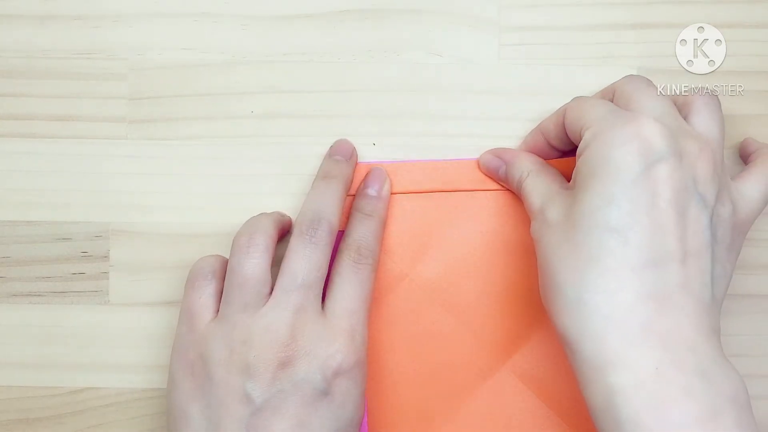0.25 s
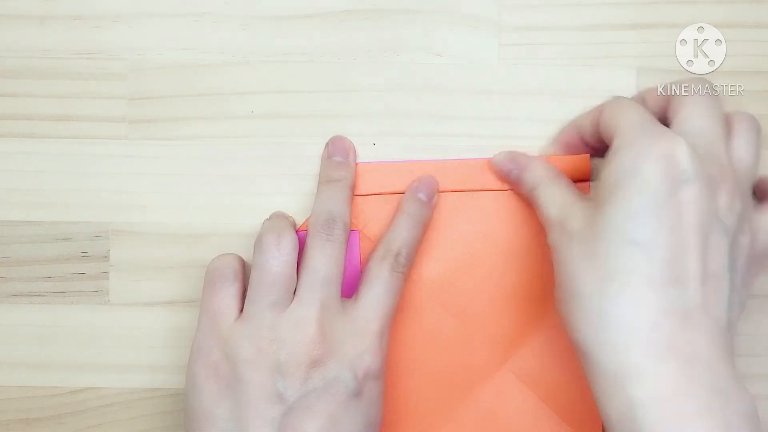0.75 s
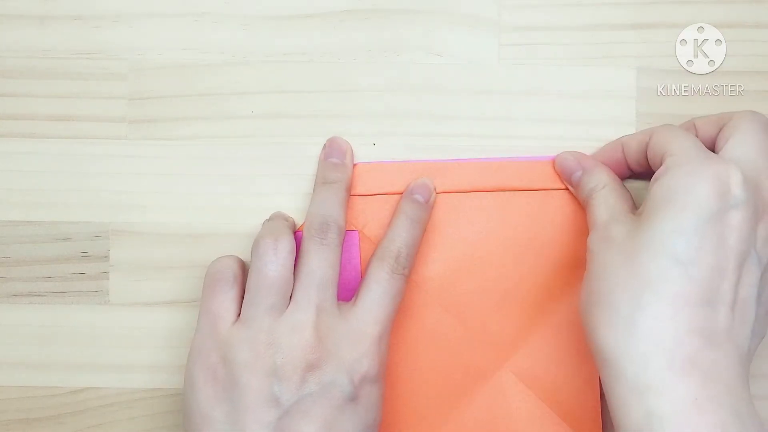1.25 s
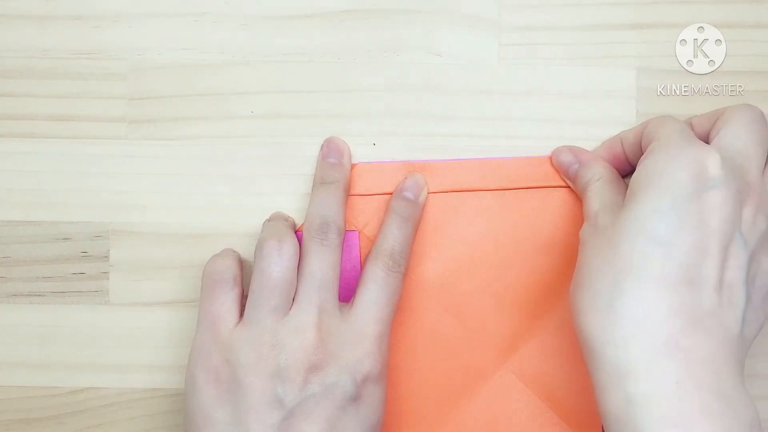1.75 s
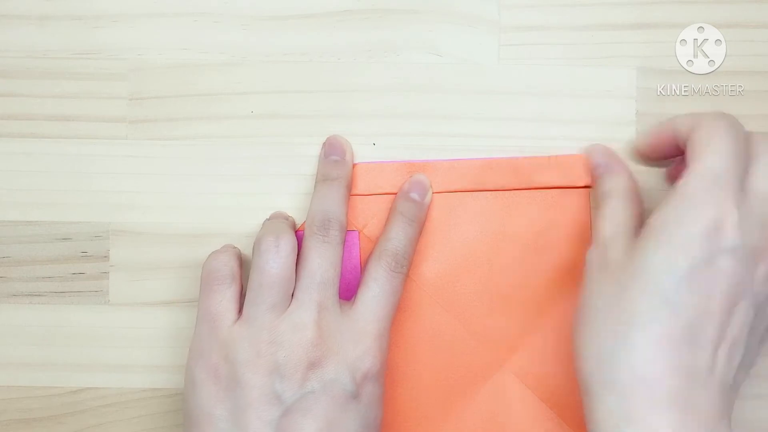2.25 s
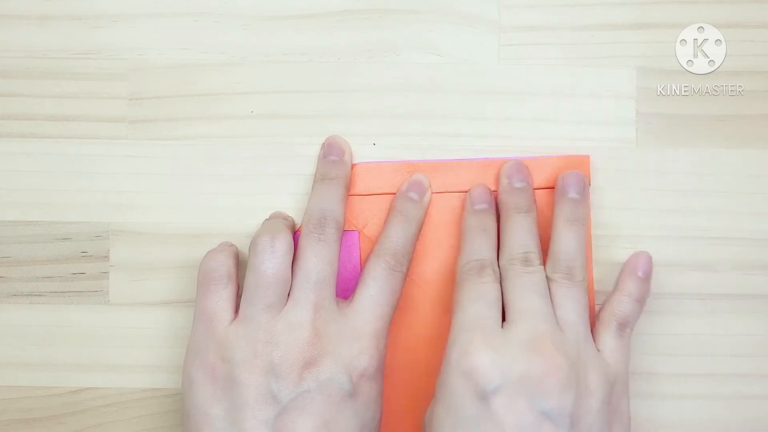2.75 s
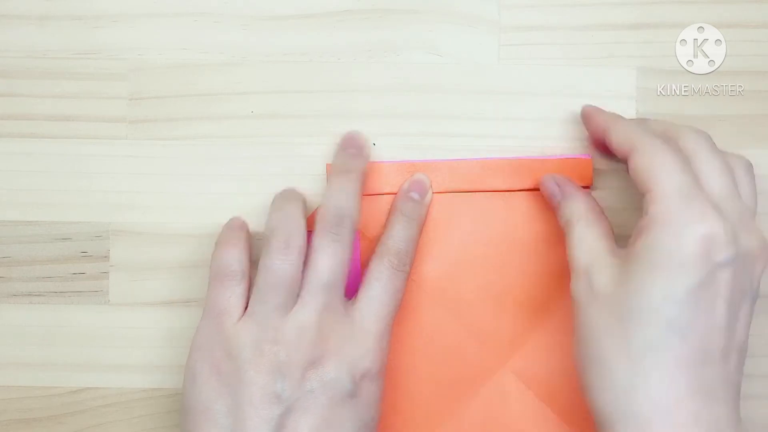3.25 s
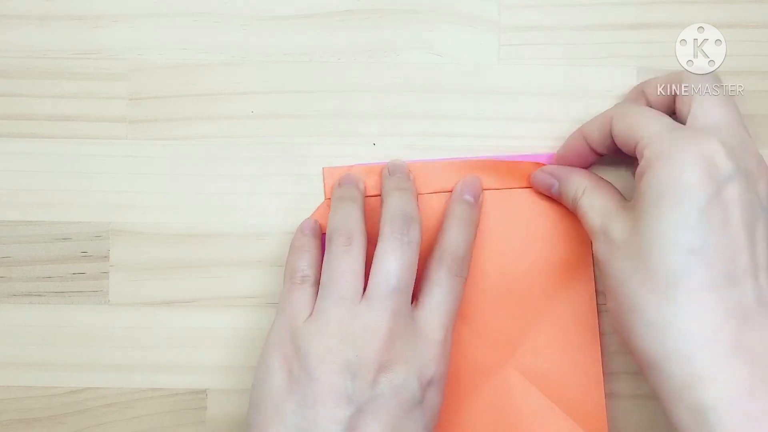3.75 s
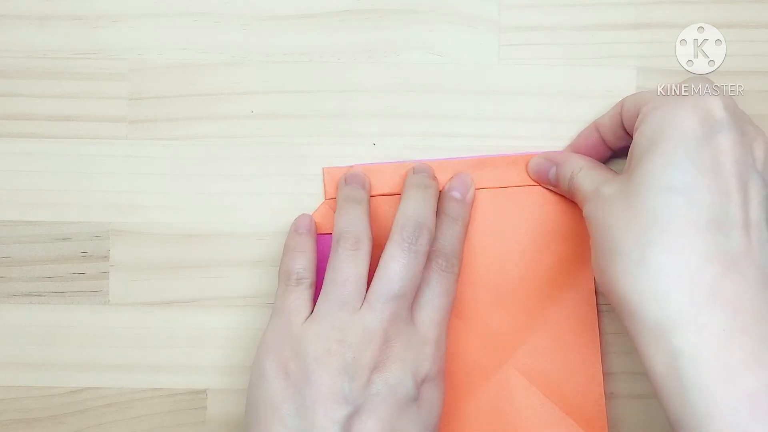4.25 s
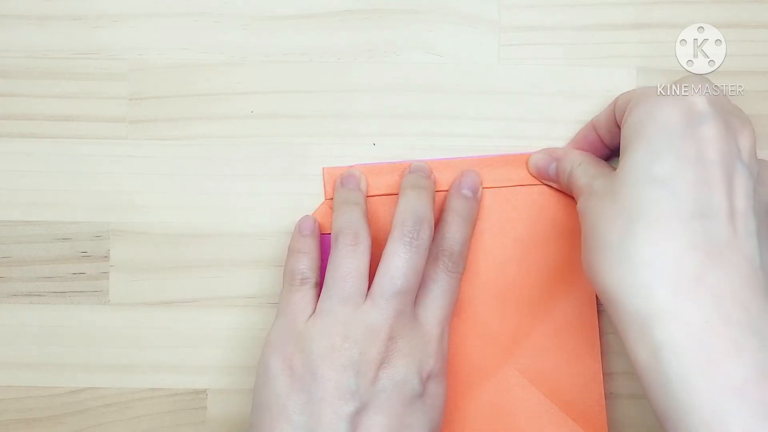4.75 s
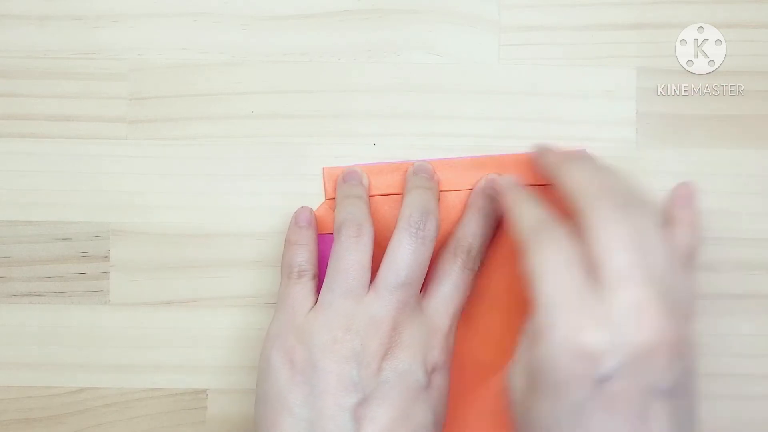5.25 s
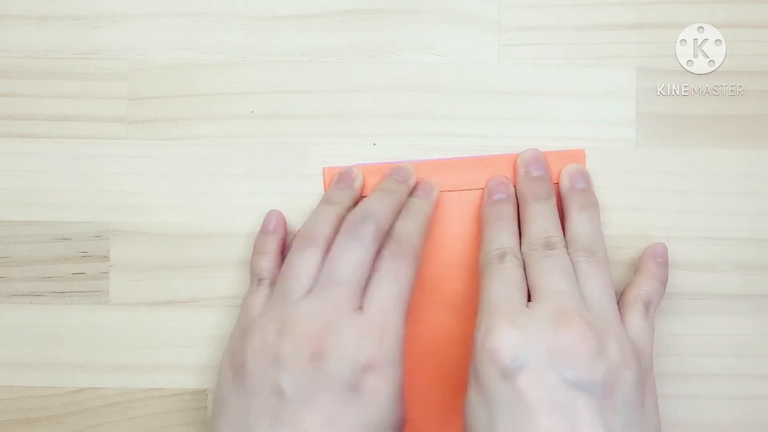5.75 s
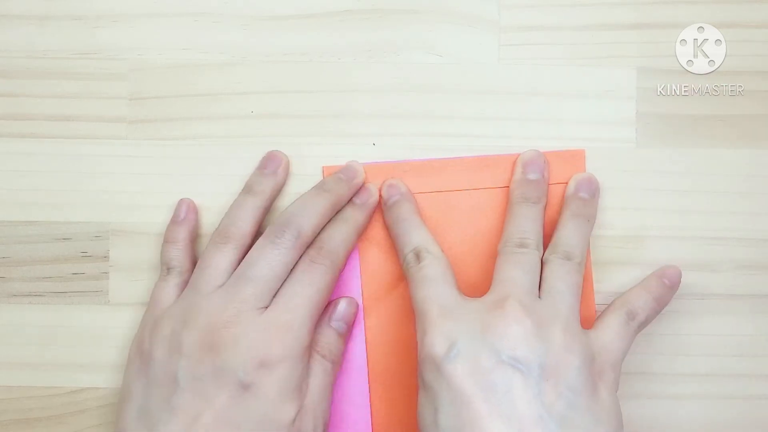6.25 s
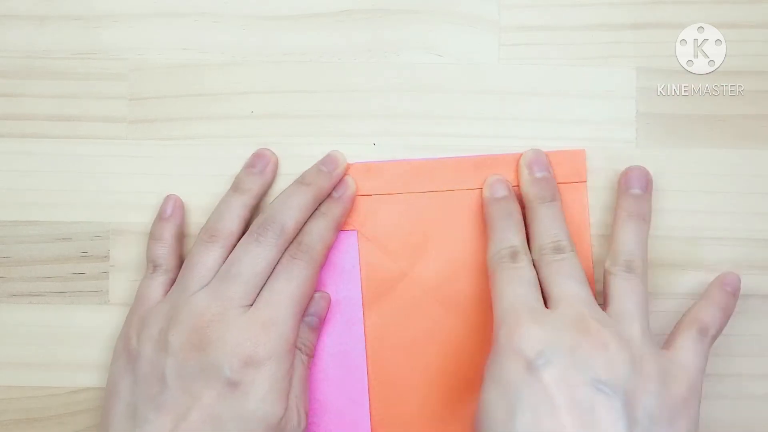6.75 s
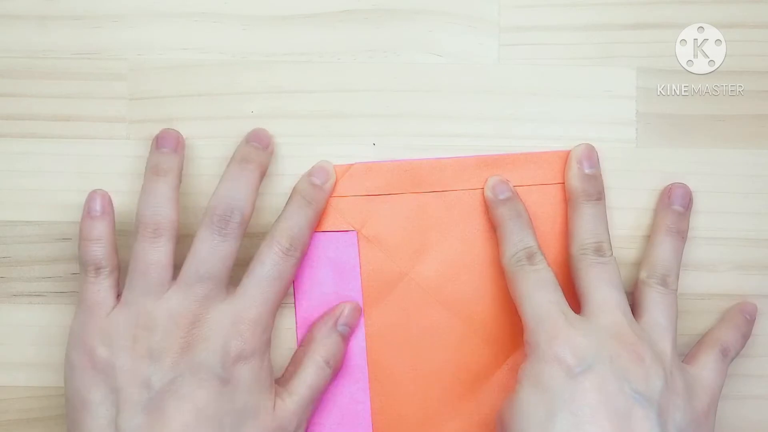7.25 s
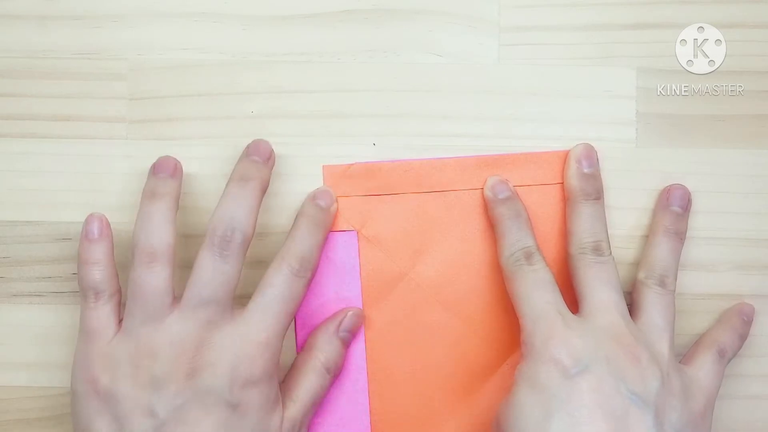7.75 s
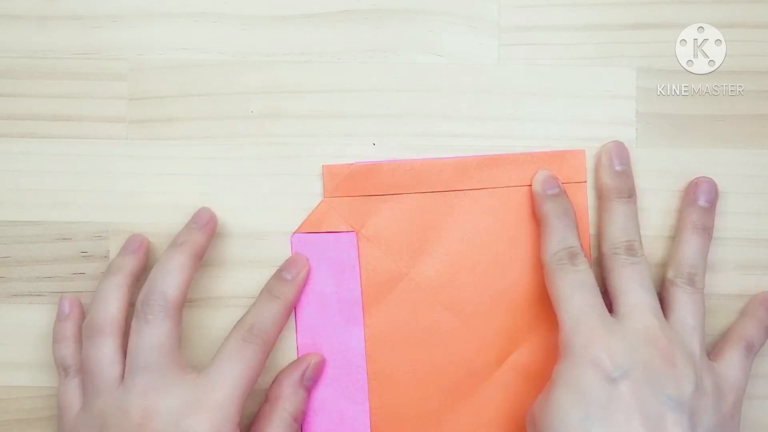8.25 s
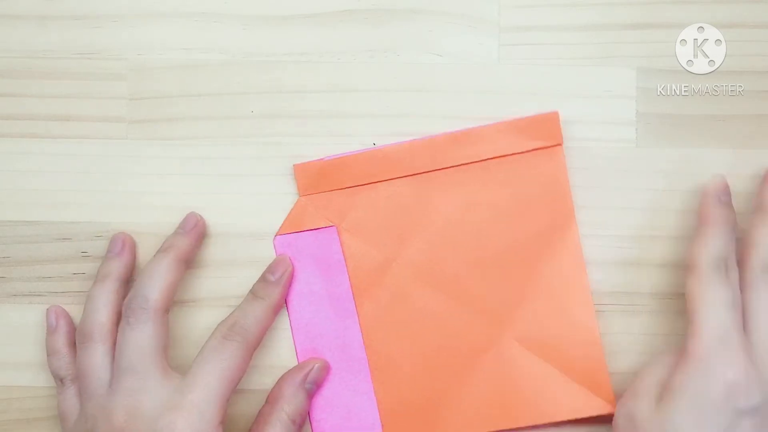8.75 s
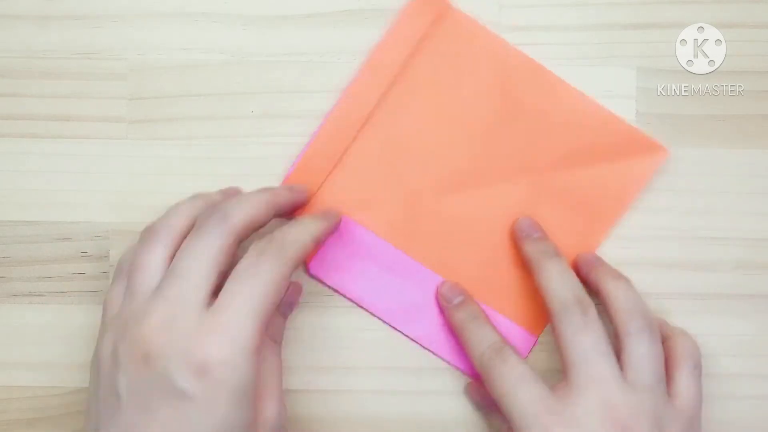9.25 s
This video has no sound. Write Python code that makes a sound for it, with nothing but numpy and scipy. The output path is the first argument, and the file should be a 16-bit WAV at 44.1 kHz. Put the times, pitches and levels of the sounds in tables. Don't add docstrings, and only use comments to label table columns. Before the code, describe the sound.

Close-up paper folding: skin rubs over crisp paper, folds snap and pop, fingertips tap the wood, and low bumps sway beneath.

```python
import sys
import numpy as np
from scipy import signal
from scipy.fft import rfft, irfft
from scipy.io import wavfile

SR = 44100
rng = np.random.default_rng(int(sys.argv[2]) if len(sys.argv) > 2 else 0)


def put_to_file(sound):
    columns = np.atleast_2d(sound).T
    safe = np.clip(columns, -1, 1)
    whole_steps = np.round(safe * 32767)
    wavfile.write(sys.argv[1], SR, whole_steps.astype(np.int16))


def amplitude_ratio(level_db):
    exponent = np.asarray(level_db, float) / 20
    return 10 ** exponent


N = 418950


def rms_one(x):
    return x / np.sqrt(np.mean(x ** 2) + 1e-20)


def seconds(length_s):
    return np.arange(round(length_s * SR)) / SR


def in_time(rows):
    s, *columns = np.transpose(rows)
    return [np.interp(np.arange(N) / SR, s, column) for column in columns]


def ms_clock():
    return np.arange(N * 1000 // SR + 1) / 1000


def at_rate(gains):
    return [np.interp(np.arange(N) / SR, ms_clock(), gain) for gain in gains]


def shaped(x, spectrum):
    hz, db = np.transpose(spectrum)
    bins = np.maximum(np.arange(N // 2 + 1) * SR / N, 1)
    gain = amplitude_ratio(np.interp(np.log(bins), np.log(hz), db))
    return rms_one(irfft(rfft(x) * gain, N))


def cut(x, hz, kind):
    sos = signal.butter(2, np.clip(hz, 10, .45 * SR), kind, fs=SR, output="sos")
    return signal.sosfilt(sos, x)


def resonate(x, hz, width_hz):
    r = np.exp(-np.pi * width_hz / SR)
    poles = [1, -2 * r * np.cos(2 * np.pi * hz / SR), r * r]
    return signal.lfilter([(1 - r * r) / 2, 0, (r * r - 1) / 2], poles, x)


def body(x, modes):
    return sum((-1) ** k * amplitude_ratio(db) * resonate(x, hz, width_hz)
               for k, (hz, width_hz, db) in enumerate(modes))


def flutter(rate_hz, depth_db):
    r = np.exp(-2 * np.pi * rate_hz / SR)
    wander = signal.lfilter([1], [1, -2 * r, r * r], rng.standard_normal(N + SR))[SR:]
    return amplitude_ratio(depth_db * rms_one(wander))


def grit(per_s, spread_db):
    sizes = amplitude_ratio(spread_db * np.minimum(rng.exponential(1, N), 4)) * rng.standard_normal(N)
    return rms_one(sizes * (rng.random(N) < per_s / SR))


def add(out, s, burst, db):
    i = round(s * SR)
    out[i:i + len(burst)] += (amplitude_ratio(db) * burst / np.abs(burst).max())[:N - i]


def swell(s, db, fall_db_per_s, rise_db_per_s=8000):
    t = ms_clock() - s
    return amplitude_ratio(db + np.minimum(rise_db_per_s * t, -fall_db_per_s * t))


# frequency in Hz, level in dB per Hz.
AIR_SPECTRUM = [(15, -20), (28, 3.5), (62, 2), (110, -49), (200, -15.5), (300, -20.5), (760, -25.5),
                (970, -21), (1600, -30.5), (4500, -39), (9600, -42), (12300, -41), (13600, -52.5),
                (16000, -49.5)]


def room_air():
    return amplitude_ratio(-55) * shaped(rng.standard_normal(N), AIR_SPECTRUM)


def room(x):
    t60_s, first_echo_s = 0.244, .004
    t = seconds(.2)
    tail = cut(rng.standard_normal(len(t)), 6920, "low") * amplitude_ratio(-60 * t / t60_s) * (t > first_echo_s)
    return signal.fftconvolve(x, tail / np.sqrt(np.sum(tail ** 2)))[:N]


# time in seconds, deep sway in dB.
LEAN = [(0, -52.5), (.4, -57), (1.2, -52.5), (2.75, -57), (3.09, -53.5), (3.31, -36.5), (3.72, -35),
        (3.85, -45.5), (4.23, -52), (4.7, -53), (5.22, -48), (5.3, -33), (5.48, -37), (5.79, -48),
        (6.05, -52.5), (7, -53.5), (8.3, -56), (9.5, -50.5)]
# time of the peak in seconds, deep sway in dB, legs in dB relative to it,
# # seconds to fall 20 dB.
JOLTS = [(.66, -52, -14, 0.03), (1.88, -41, -11.5, 0.15), (2.04, -42, -11, 0.2842),
         (2.35, -41.5, -17, 0.28), (2.64, -51, -2, 0.08), (3.31, -40, -12, .3), (3.55, -35, -6, 0.18),
         (3.729, -36, -10, 0.18), (3.9, -36.5, -16.5, .5), (1.55, -46.5, -10.5, 0.44),
         (6.05, -45.5, -15, 0.23), (6.66, -41.5, -11, 0.32), (8.05, -47, -9.5, 0.25), (4.34, -48, -6, 0.06),
         (4.87, -42, -2, 0.1045), (5.13, -43, -22, 0.52), (5.262, -34.5, 5.5, 0.1945), (5.6, -44, -1, 0.3),
         (5.84, -50, 5, 0.15), (6.16, -42, -4, 0.4), (6.72, -43, -15, 0.22), (6.77, -48, 3, 0.24),
         (7.01, -50, -2, 0.52), (7.73, -47.5, -7, 0.33), (7.86, -55.5, 3, 0.56), (8.2, -49.5, -5.5, 0.06),
         (8.91, -46, -12, 0.04), (9.24, -46, -2, 0.2)]


def rocking():
    legs_under_db, resting_legs_db = -10.5, -64
    rise_db_per_s, legs_rise_faster, legs_die_faster = 252, 2.5, 1.32
    deep = amplitude_ratio(np.interp(ms_clock(), *np.transpose(LEAN)))
    upper = np.maximum(deep * amplitude_ratio(legs_under_db), amplitude_ratio(resting_legs_db))
    for s, db, legs_db, fall_s in JOLTS:
        fall_db_per_s = 20 / fall_s
        deep = np.maximum(deep, swell(s, db, fall_db_per_s, rise_db_per_s))
        legs = swell(s, db + legs_db, legs_die_faster * fall_db_per_s, legs_rise_faster * rise_db_per_s)
        upper = np.maximum(upper, legs)
    return at_rate([deep, upper])


# frequency in Hz, width in Hz, level in dB.
STAND_MODES = [(38.5, 8.25, -1), (64.16, 15.73, 1.5), (82.65, 20.84, -1.5), (107.56, 20.6, -7.5)]
# frequency in Hz, width in Hz, level in dB.
LEG_MODES = [(125.15, 41.4, 2), (189.1, 28.2, 0.5), (242.7, 48.5, -10)]


def sway():
    deep_gain, upper_gain = rocking()
    deep = body(rng.standard_normal(N), STAND_MODES)
    deep = rms_one(cut(cut(deep, 127.8, "low"), 24.4, "high"))
    upper = body(grit(400, 1.4), LEG_MODES)
    upper = rms_one(cut(cut(upper, 248.3, "low"), 80.2, "high"))
    return deep_gain * deep + upper_gain * upper


# start in seconds, peak in dB, frequency in Hz, T60 in seconds.
KNOCKS = [(.63, -39, 55, .15), (3.51, -26, 82, .3), (3.565, -30, 68, .4), (3.72, -30, 62, .4),
          (4.862, -26, 48, .13), (5.275, -24, 95, .1), (5.33, -25, 66, .3), (5.43, -34, 55, .15),
          (6.165, -32, 58, .15), (8.888, -32, 84, .15), (9.235, -34, 75, .15)]


def knocks():
    rise_s = .012
    out, t = np.zeros(N), seconds(.3)
    for s, db, hz, t60_s in KNOCKS:
        envelope = (1 - np.exp(-t / rise_s)) ** 2 * amplitude_ratio(-60 * t / t60_s)
        add(out, s, envelope * np.sin(2 * np.pi * hz * t), db)
    return out


# frequency in Hz, width in Hz, level in dB.
BOARD_MODES = [(334, 26, 3.5), (422.3, 33.5, 5.5), (634, 42, -0.5)]
# frequency in Hz, width in Hz, level in dB.
BOARD_TOP_MODES = [(996, 266, -12), (1490.4, 86.8, 4), (1664.8, 50.8, 0), (2000, 113, -2.5),
                   (3140, 164, -2), (2400, 150, -5)]
# start in seconds, peak in dB, thud and nail in dB relative to it.
TAPS = [(0.003, -43, -13, -6), (0.475, -53, -11, 11.5), (0.572, -38.5, -14.5, -5), (2.004, -38.5, 5, -3.5),
        (2.084, -41, -15.5, -3), (2.14, -50, -0.5, 12), (2.407, -39.5, -11.5, -8.5),
        (3.152, -42.5, 11, -10.5), (3.495, -41, 18.5, 2.5), (3.601, -49, 3, 16), (3.846, -40, -18, 2.5),
        (4.309, -42.5, 4, -9.5), (4.342, -41, -20, 0), (4.851, -26, -12.5, -14.5), (5.406, -37.5, 9, -12.5),
        (5.831, -22, -24, -8), (6.121, -37, 2.5, -9), (6.141, -27, 6, -2.5), (6.239, -28, -14, -5.5),
        (6.381, -32.5, -14.5, -10.5), (6.444, -39.5, -14.5, -4), (6.544, -46, -9, 6.5), (6.759, -37, 7, -4),
        (6.789, -33, -15.5, -1), (7.709, -34.5, -5.5, 1.5), (8.161, -35.5, -18, 1), (9.12, -51, -11, 10.5),
        (9.225, -23.5, -15.5, -17.5)]
# start in seconds, peak in dB.
TOUCHES = [(0.121, -41.5), (0.531, -38.5), (1.54, -45), (1.673, -43), (1.799, -45), (1.851, -47.5),
           (2.035, -33.5), (2.247, -46.5), (2.6, -37), (3.228, -42.5), (4.001, -45), (4.459, -53.5),
           (4.738, -37.5), (4.941, -40), (5.353, -43.5), (5.487, -38), (5.527, -38), (5.586, -38.5),
           (6.647, -35), (6.7, -34.5), (6.994, -36.5), (7.075, -40.5), (5.34, -36.5), (6.56, -35.5),
           (7.899, -39), (9.437, -45.5)]
# start in seconds, peak in dB.
PALM = [
    (5.246, -35),
    (5.257, -29),
    (5.271, -32.5),
    (5.284, -33.5),
    (5.31, -36),
]


def taps():
    touch_thud_db, touch_nail_db = -5, -17
    tap_t60_s, skid_t60_s, skid_db = .012, .05, -8
    out, t = np.zeros(N), seconds(.12)
    rows = TAPS + [(s, db, touch_thud_db, touch_nail_db) for s, db in TOUCHES]
    dying = amplitude_ratio(-60 * t / tap_t60_s) + amplitude_ratio(skid_db - 60 * t / skid_t60_s)
    noise = rng.standard_normal((len(rows) + len(PALM), len(t))) * dying
    pads = cut(cut(cut(noise, 162, "high"), 950, "low"), 950, "low")
    pads = amplitude_ratio(-7) * pads + body(pads, BOARD_MODES)
    nails = cut(cut(cut(noise, 886, "high"), 2450, "low"), 3500, "low")
    nails = nails / 5 + body(nails, BOARD_TOP_MODES)
    thuds = body(noise, LEG_MODES)
    for (s, db, thud_db, nail_db), pad, nail, thud in zip(rows, pads, nails, thuds):
        add(out, s, pad, db - 6.5)
        add(out, s, nail, db + nail_db)
        add(out, s, thud, db + thud_db - 16)
    for (s, db), pad in zip(PALM, pads[len(rows):]):
        add(out, s, cut(cut(pad, 390, "low"), 390, "low"), db)
    return out


# start in
# seconds, # length in seconds, level in dB, first and last frequency in Hz.
SINGING = [(5.62, .2, -66, 5600, 6200), (5.75, .07, -66, 10500, 11000), (6.44, .16, -63, 2750, 2950),
           (6.5, .1, -66, 3500, 3400), (7.75, .02, -60, 4500, 4500), (8.22, .1, -66, 5600, 5800),
           (8.66, .09, -53, 6000, 6700), (8.78, .1, -55, 6300, 5700), (8.79, .09, -59, 3000, 3150),
           (8.92, .04, -56, 8500, 8800), (9.0, .045, -56, 5000, 4700), (9.09, .14, -55, 8800, 8200),
           (9.2, .12, -58, 8800, 9000), (9.1, .06, -58, 6300, 6000), (9.12, .1, -60, 750, 830),
           (0.0, .035, -58, 1050, 1000), (0.25, .05, -64, 1000, 900), (3.603, .03, -49, 1250, 2000),
           (3.51, .07, -57, 1700, 2200), (.535, .02, -54, 650, 620), (.5, .07, -60, 5700, 5800),
           (.66, .05, -61, 4000, 3700), (8.74, .04, -58, 600, 640), (8.88, .06, -56, 800, 760),
           (9.25, .04, -56, 620, 640), (5.64, .17, -60, 1550, 1500), (5.25, .04, -56, 880, 800),
           (.1, .2, -62, 340, 330), (9.44, .05, -57, 800, 800)]


def singing():
    width = 0.17
    out = np.zeros(N)
    noise = rng.standard_normal((len(SINGING), 2, SR // 3))
    for (s, length_s, db, from_hz, to_hz), pair in zip(SINGING, noise):
        whole_s = 1.4 * length_s
        share = seconds(min(whole_s, .3)) / whole_s
        phase = 2 * np.pi * np.cumsum(from_hz + (to_hz - from_hz) * share) / SR
        a, b = cut(pair, width * from_hz / 2, "low")[:, -len(share):]
        band = rms_one(a * np.cos(phase) + b * np.sin(phase))
        i = max(round((s - .2 * length_s) * SR), 0)
        out[i:i + len(share)] += amplitude_ratio(db) * np.sin(np.pi * share) * band
    return out


def stroke(s, length_s):
    attack_s, release_s = 0.0075, 0.021
    t, ease_s = ms_clock() - s, 0.134 * length_s
    rise = .5 + t / (attack_s + ease_s)
    fall = .5 + (length_s - t) / (release_s + ease_s)
    return np.clip(np.minimum(rise, fall), 0, 1)


# start in seconds, length in seconds, hiss in dB, pressure on the board in dB relative to
STROKES = [(0.496, 0.099, -54, -7.5), (0.604, 0.1736, -49.5, -8), (.775, 0.067, -60, -2.5),
           (1.309, 0.0215, -62.5, 5), (1.992, 0.048, -67.5, 7.5), (2.087, 0.0646, -53.5, -7),
           (2.336, 0.0316, -59, 0.27), (2.364, 0.144, -52, -16.5), (2.498, 0.0339, -58.5, -12.5),
           (2.595, 0.0248, -62, 0.08), (2.711, 0.087, -66.5, -2), (2.844, 0.085, -59.5, -11),
           (2.934, 0.0626, -55, -10.5), (2.993, .05, -61.5, 0.72), (3.172, 0.123, -65, 6.5),
           (3.28, 0.063, -60, 4.5), (3.342, 0.127, -70, 12), (3.473, 0.1097, -53, 0.3),
           (3.599, 0.042, -51.5, 1.34), (3.642, .07, -61, 3.5), (3.71, 0.1255, -62.5, -1.18),
           (3.859, 0.192, -66.5, 2.5), (4.649, 0.0595, -59, -17), (4.848, 0.052, -55, -5.3),
           (4.899, .04, -66.5, 6.5), (4.946, 0.067, -54, -11.5), (5.189, 0.021, -68, 6.5),
           (5.246, 0.0256, -73, 19.5), (5.27, 0.0604, -53, -2.5),
           (5.407, 0.253, -63, 5), (5.641, 0.0996, -60, 7.5), (5.73, 0.099, -57, 2),
             (5.827, 0.0708, -62, 9.5), (5.899, 0.19, -69, 7), (6.24, .06, -64, 8), (6.3, .08, -70, 2),
             (6.81, .1, -68, 3), (6.135, 0.036, -62.5, 9.5), (6.179, 0.107, -66, 12),
             (6.377, 0.178, -64, 11), (6.545, 0.0532, -60.5, 13.5), (6.601, 0.1595, -65.5, 11.5),
             (6.755, 0.0579, -56.5, 11), (6.036, 0.0206, -71, 4), (6.34, 0.0158, -67, .1),
             (9.439, .07, -59.5, 11.5), (7.073, 0.0507, -62, -0.25), (7.343, 0.0794, -60.5, 0.29),
             (7.725, 0.062, -59, 3.93), (7.842, 0.185, -67, 4.5), (8.001, 0.0356, -60.5, 3),
             (8.03, .13, -68, 3.5), (8.162, 0.0505, -58, 6.5), (8.198, 0.185, -59.5, 2.5),
             (8.56, 0.1, -62, 1.14), (8.654, 0.108, -50, -5), (8.772, 0.11, -50.5, -4),
             (8.878, 0.0448, -51, 2.5), (8.922, 0.045, -51, -10), (8.965, .03, -55, -10),
             (8.995, .055, -50, -10), (9.04, .03, -53.5, -8), (9.06, 0.075, -51.5, -8.5),
             (9.117, 0.2194, -50, -3), (9.32, .05, -55, -3), (9.337, 0.164, -60.5, 3.5)]


def friction():
    resting_db = [[-79], [-72], [-68.5]]
    hiss, sheet, board = amplitude_ratio(resting_db) + 0 * ms_clock()
    for s, length_s, db, pressure_db in STROKES:
        gain = amplitude_ratio(db) * stroke(s, length_s)
        hiss = np.maximum(hiss, gain)
        sheet = np.maximum(sheet, gain * amplitude_ratio(-4 + 0.57 * pressure_db))
        board = np.maximum(board, gain * amplitude_ratio(pressure_db))
    for s, db, *_ in CRACKS + POPS:
        sheet = np.maximum(sheet, swell(s, -34 + 0.619 * db, fall_db_per_s=350.5))
    for s, db, _, nail_db in TAPS:
        board = np.maximum(board, swell(s, db - 13.5 + 0.474 * nail_db, fall_db_per_s=153))
    return at_rate([hiss, sheet, board])


# frequency in Hz, level in dB per Hz.
HISS_SPECTRUM = [(2350, -18), (4000, -7.5), (7620, -4.5), (8650, 1), (10300, -5), (14200, -9.5),
                 (15200, -18.5), (16000, -37.5)]
# frequency in Hz, width in Hz, level in dB.
POCKET_MODES = [(5720, 320, 0), (8700, 800, -4)]
# time in seconds, level in dB.
POCKET_LEVEL = [
    (0, 5.5),
    (3.1, 4.5),
    (4.2, -3.5),
    (9.5, -7.5),
]
# time in seconds, level of the upper hiss in dB.
SHINE = [(0, -1.5), (.9, -3.5), (1.3, 0), (6, .5), (6.5, 1.5), (8.2, 1), (8.7, -2.5), (9.5, -0.4)]


def dry_hiss():
    fine = shaped(grit(11000, 1.6), HISS_SPECTRUM)
    low, dull = cut(fine, 5200, "low"), cut(fine, 9520, "low")
    bright = cut(fine, 13700, "high")
    bands = (low, dull - low, fine - dull - bright, bright)
    patches = [band * flutter(12, 1.3) for band in bands]
    upper = amplitude_ratio(*in_time(SHINE)) * sum(patches[2:])
    pocket = amplitude_ratio(*in_time(POCKET_LEVEL)) * body(fine, POCKET_MODES)
    return rms_one(sum(patches[:2]) + upper + pocket)


# frequency in Hz, width in Hz, level in dB.
SHEET_MODES = [(2000, 322, -7), (2400, 51, 5), (2818, 73, -7), (3140, 114, -0.5)]


def sheet_rustle():
    rustle = cut(cut(grit(9000, 2.2), 1800, "high"), 4600, "low")
    return rms_one(rustle / 2 + body(rustle, SHEET_MODES)) * flutter(30, 0.42)


def board_rub():
    rub = cut(cut(grit(2500, 3.0), 307, "high"), 1750, "low")
    low = flutter(4.52, 2.64) * body(rub, BOARD_MODES)
    upper = amplitude_ratio(1.0) * body(rub, BOARD_TOP_MODES)
    return rms_one(amplitude_ratio(-8.0) * rub + low + upper) * flutter(20.5, 1.185)


def sliding():
    hiss_gain, sheet_gain, board_gain = friction()
    paper = hiss_gain * dry_hiss() + sheet_gain * sheet_rustle()
    return flutter(30, 1.8) * (paper + amplitude_ratio(-2.0) * board_gain * board_rub())


# start in seconds, peak in dB, centre in Hz, top edge in dB
CRACKS = [(0.5768, -39, 5670, -21), (0.608, -44.5, 5700, -25), (0.803, -11, 6600, -15),
          (1.311, -49.5, 5630, -9.5), (2.005, -34, 5580, -24), (2.4053, -26.5, 4990, -23.5),
          (2.599, -40, 6150, -15), (2.7891, -47.5, 5500, -24), (2.8454, -46.5, 5740, -10),
          (2.9774, -28, 5360, -8), (3.026, -35, 5270, -31), (3.4979, -27.5, 4870, -4),
          (3.5289, -33.5, 6200, -11), (3.8444, -26.5, 5260, -35), (4.342, -38.5, 4100, -29),
          (4.8509, -41, 5650, 3), (4.8872, -29, 4530, 1.5), (4.9394, -46, 7910, -8),
          (5.004, -23, 7610, -5.5), (5.002, -33, 3600, -19.5), (0.4495, -50.5, 5560, -6),
          (4.279, -50, 5600, -5), (5.1877, -43.5, 8900, -6.5), (7.0724, -46, 4610, -2.5),
          (7.165, -52.5, 5000, -3.5), (8.879, -30, 3700, -17.5), (8.896, -30, 3100, -16.5)]
# start in seconds, peak in dB, centre in Hz, top edge in dB
POPS = [(0.4774, -40, 1990, -28.5), (0.5646, -38.5, 2330, -21.5), (0.752, -37, 1930, -16.5),
        (1.2663, -47, 2380, -12), (2.085, -28, 2020, -3), (2.1413, -25, 2370, 0),
        (2.3395, -36.5, 2400, -6.5), (3.1168, -46.5, 2200, -5.5), (3.1762, -44.5, 2320, -1),
        (3.325, -39.5, 3140, -20), (3.47, -38, 2385, -3.5), (3.603, -39, 2300, -5.5),
        (3.6174, -32.5, 2230, -17.5), (4.0028, -46, 1790, -0.5), (4.061, -25, 2840, -1.5),
        (5.3088, -32, 2860, 0), (5.527, -40.5, 2000, -15.5), (6.1185, -44, 1710, -11.5),
        (6.1404, -39, 3140, -1.5), (6.2407, -41, 2000, -21), (6.543, -42, 1990, -21),
        (6.759, -38, 1990, -14), (6.7796, -35, 2020, -5.5), (7.345, -47, 1970, -3),
        (7.7075, -38.5, 2720, -35.5), (7.819, -25, 3210, -34), (8.0222, -43, 2730, -16),
        (8.1604, -37.5, 2425, -19.5), (8.8898, -32.5, 2000, -21.5)]
# start in seconds, peak in dB, centre in Hz, top edge in dB relative to the core.
TICKS = [(5.4142, -46, 2510, -8), (5.481, -47, 2800, -6), (6.047, -55, 6000, 0), (6.2169, -44, 3040, -12),
         (6.3466, -52, 9600, 0), (6.38, -47, 2750, -8), (6.6484, -49, 9000, 0), (6.6993, -49, 9000, 0),
         (6.7327, -45, 2960, -10), (7.98, -52, 2500, -10), (8.5632, -48, 3010, -4), (8.6535, -41, 6290, -6),
         (8.7727, -40, 7400, -4), (8.911, -36, 2600, -15), (8.9952, -41, 5880, -4), (9.2, -42, 2000, -15),
         (.8065, -23, 8000, -8), (.7615, -40, 1800, -20), (.58, -42, 2600, -20), (2.004, -40, 2250, -20),
         (4.866, -42, 5600, -20), (4.893, -36, 3600, -15), (5.007, -28, 2600, -2), (3.609, -38, 1700, -20),
         (3.625, -40, 2400, -20)]


def snaps(rows):
    rise_s, crack_t60_s, crunch_t60_s, crunch_db, ring_db = .0003, .006, .03, -11, -5.5
    out, t = np.zeros(N), seconds(.06)
    noise = rng.standard_normal((len(rows), 2, len(t)))
    decay = amplitude_ratio(-60 * t / crack_t60_s) + amplitude_ratio(crunch_db - 60 * t / crunch_t60_s)
    dying = (1 - np.exp(-t / rise_s)) * decay
    for (s, db, hz, top_db), (low, high) in zip(rows, noise * dying):
        wide = cut(cut(low, 1500, "high"), 1500, "high")
        wide = cut(cut(wide, 2.2 * hz, "low"), min(1.6 * hz, 8500), "low")
        core = resonate(resonate(low, hz, hz / 3), hz, hz / 3)
        core = rms_one(core) + amplitude_ratio(-5.5) * rms_one(wide)
        ring = amplitude_ratio(ring_db) * min(2500 / hz, 1) ** 3 * rms_one(body(wide, SHEET_MODES))
        edge = cut(cut(high, 5200, "high"), 8800, "low")
        edge = rms_one(cut(cut(edge, 8800, "low"), 13000, "low"))
        add(out, s, rms_one(core) + ring + amplitude_ratio(top_db + 4) * edge, db)
    return out


def scene():
    hits = taps() + snaps(CRACKS + POPS)
    background = room_air() + amplitude_ratio(-21.5) * room(hits) + sway() + knocks()
    paper = singing() + sliding() + snaps(TICKS)
    return (background + hits + paper)[None]


def low_pass(x):
    return signal.sosfilt(signal.butter(12, 16460, fs=SR, output="sos"), x)


def record(dry):
    coloured = dry + 0.285 * resonate(dry, 5640, 166) - 0.64 * resonate(dry, 10405, 487)
    top = signal.cheby2(10, 60, 16700, fs=SR, output="sos")
    mix = signal.sosfilt(top, coloured)
    return low_pass(mix)


dry = scene()
out = record(dry)
put_to_file(out)
```